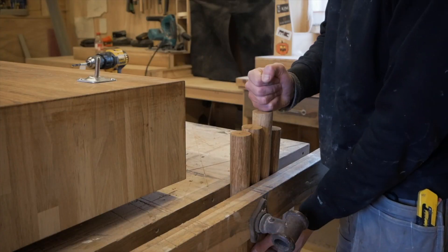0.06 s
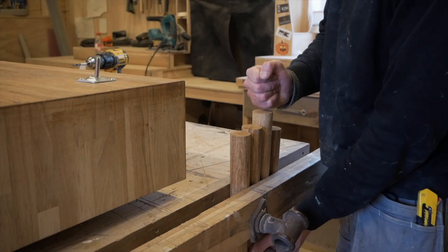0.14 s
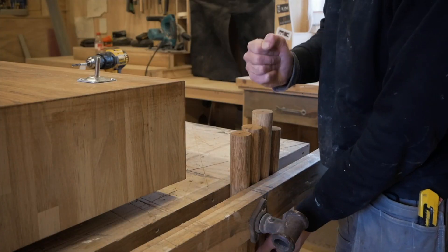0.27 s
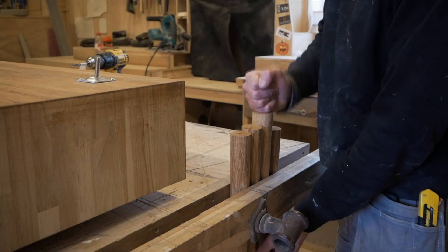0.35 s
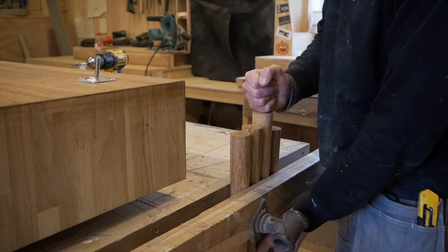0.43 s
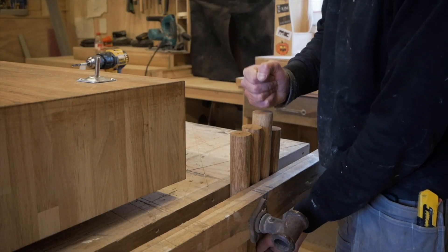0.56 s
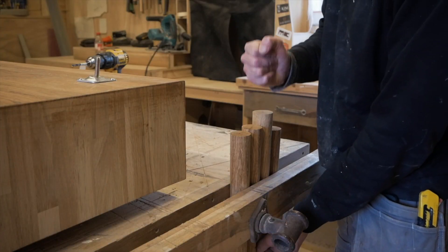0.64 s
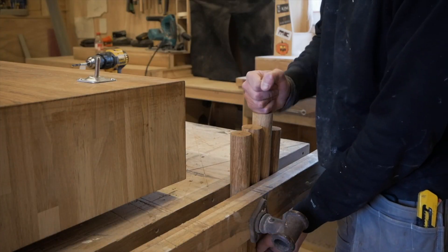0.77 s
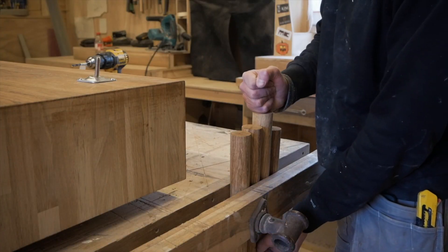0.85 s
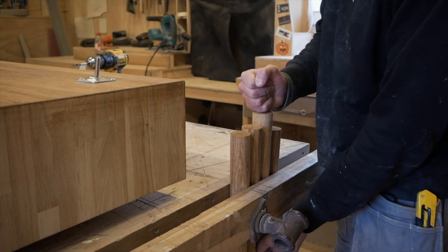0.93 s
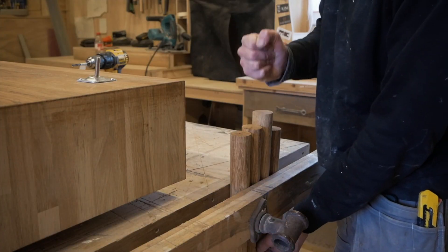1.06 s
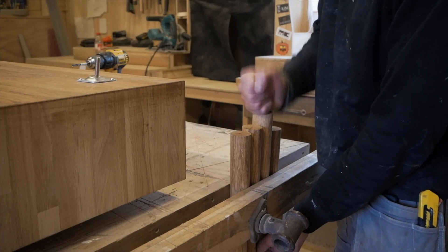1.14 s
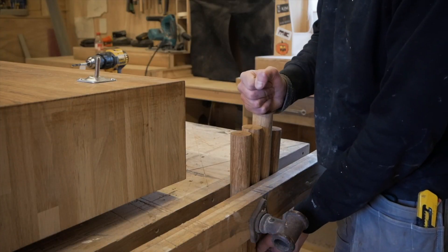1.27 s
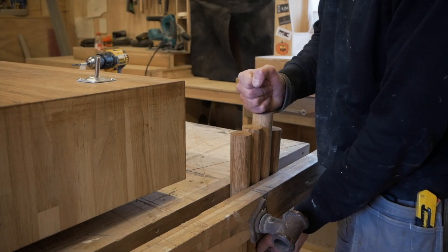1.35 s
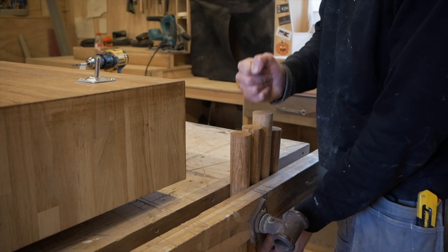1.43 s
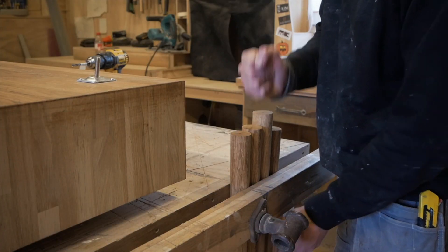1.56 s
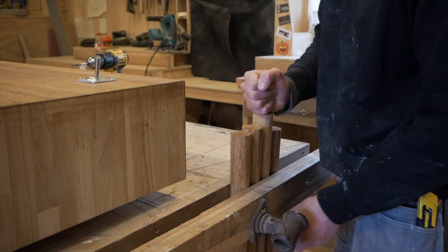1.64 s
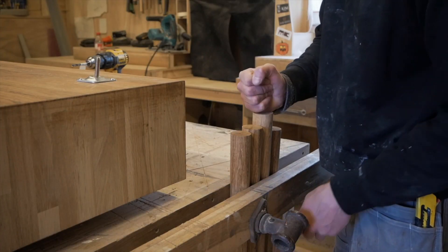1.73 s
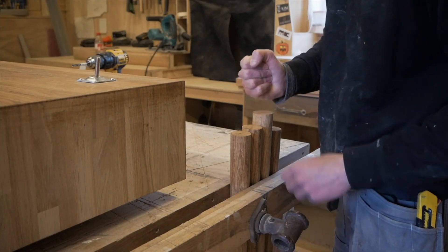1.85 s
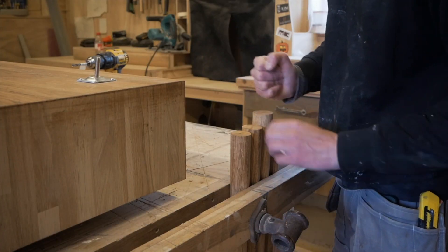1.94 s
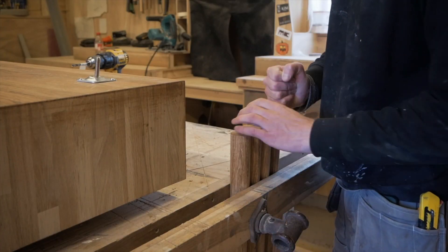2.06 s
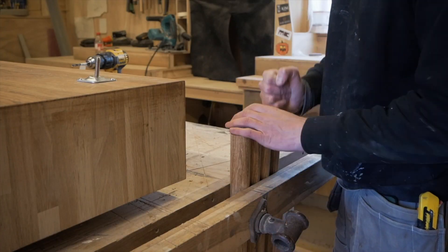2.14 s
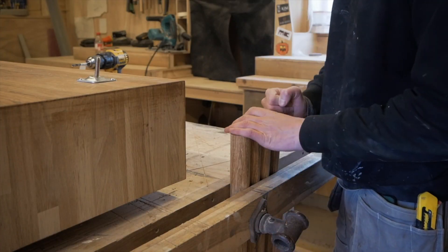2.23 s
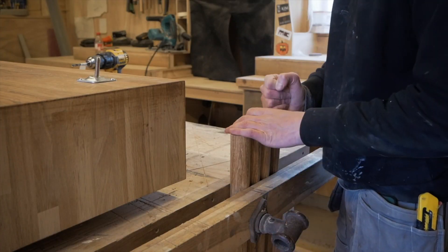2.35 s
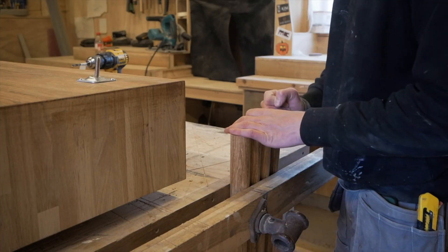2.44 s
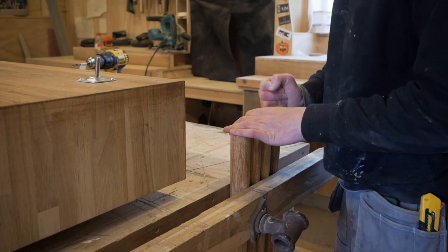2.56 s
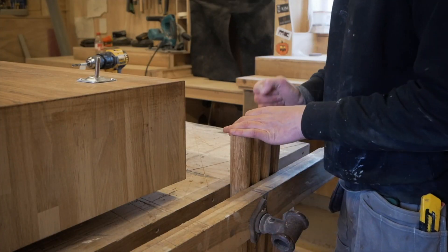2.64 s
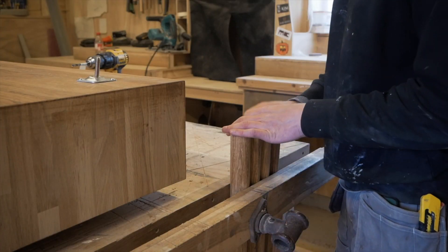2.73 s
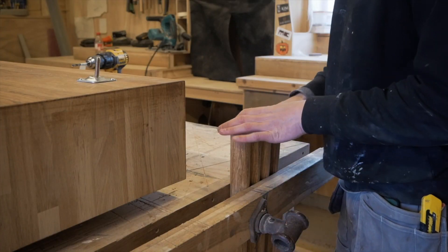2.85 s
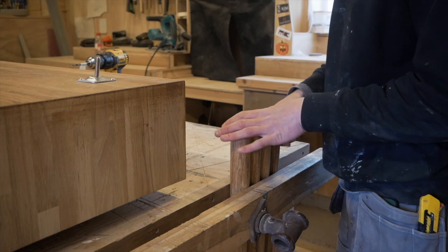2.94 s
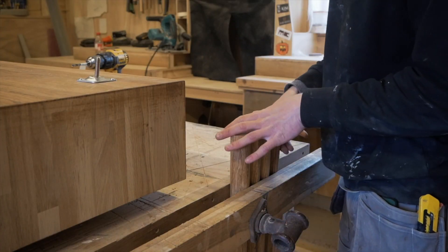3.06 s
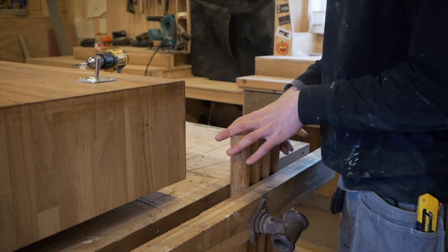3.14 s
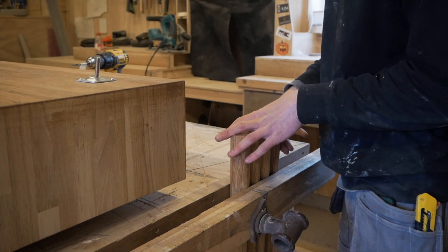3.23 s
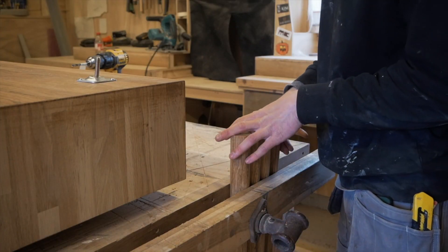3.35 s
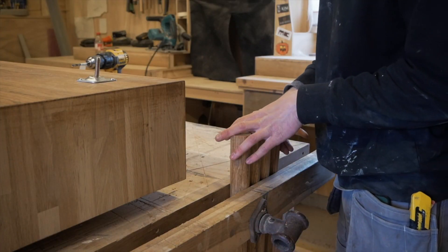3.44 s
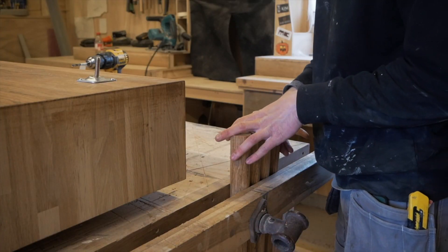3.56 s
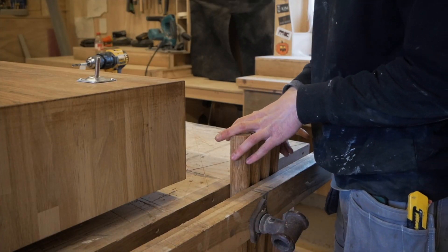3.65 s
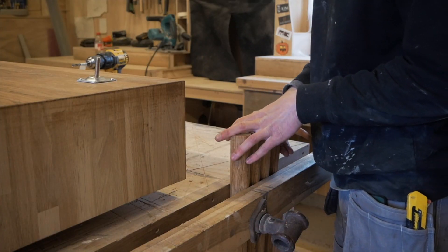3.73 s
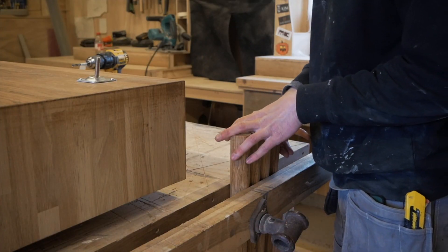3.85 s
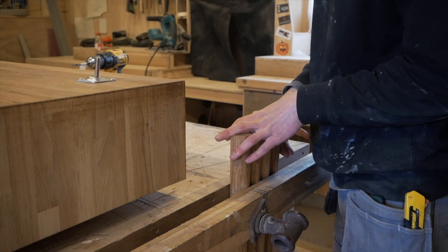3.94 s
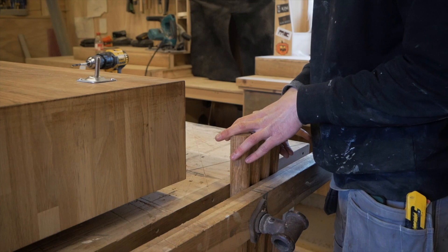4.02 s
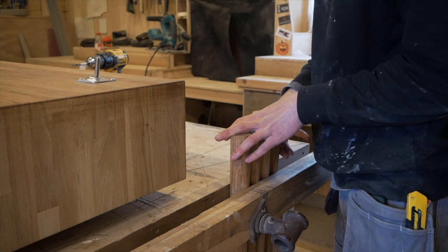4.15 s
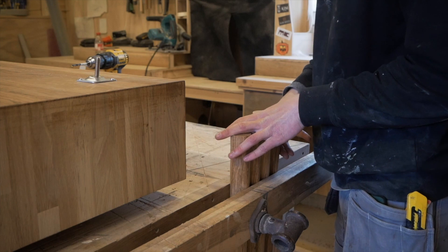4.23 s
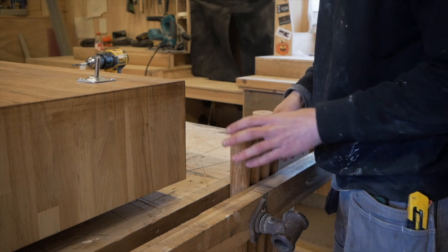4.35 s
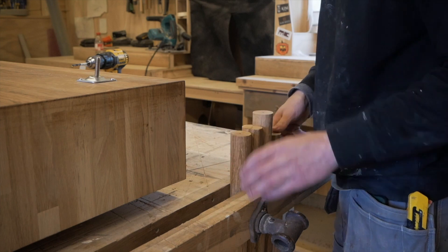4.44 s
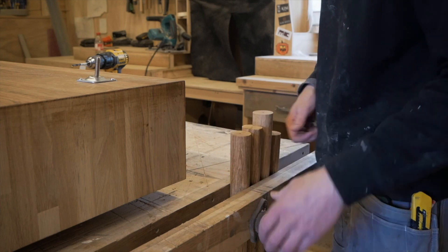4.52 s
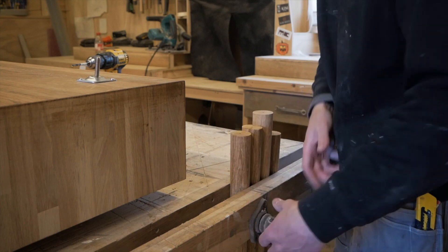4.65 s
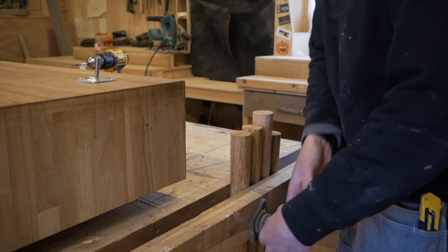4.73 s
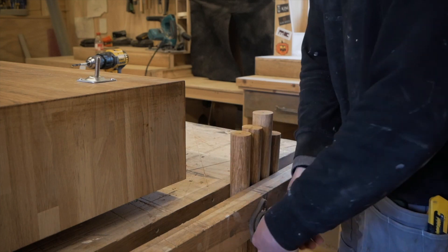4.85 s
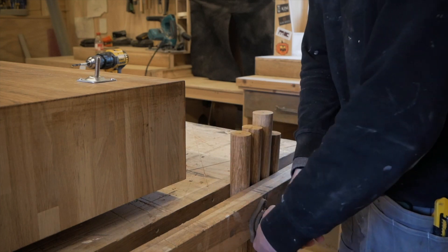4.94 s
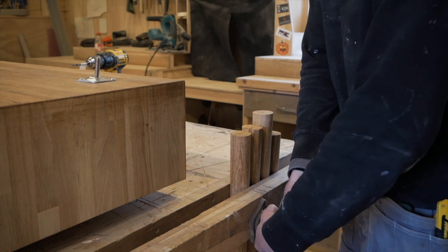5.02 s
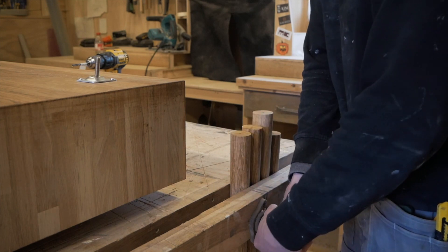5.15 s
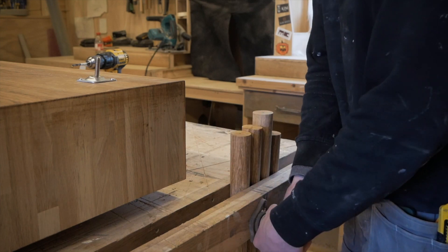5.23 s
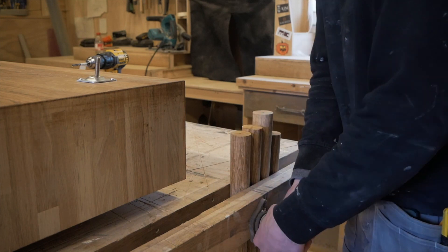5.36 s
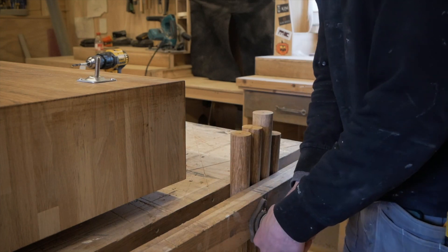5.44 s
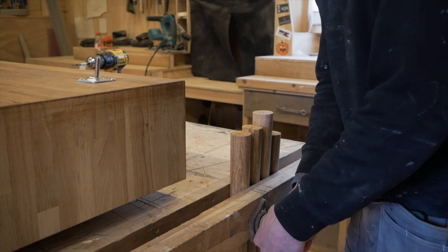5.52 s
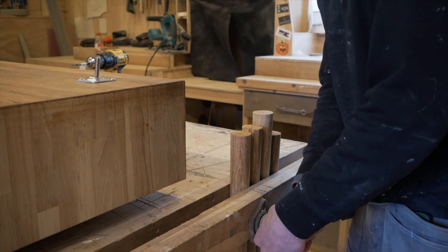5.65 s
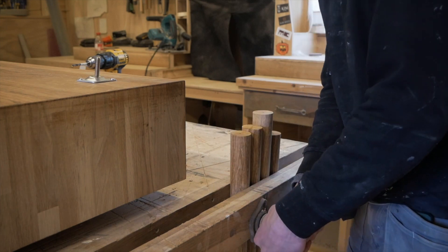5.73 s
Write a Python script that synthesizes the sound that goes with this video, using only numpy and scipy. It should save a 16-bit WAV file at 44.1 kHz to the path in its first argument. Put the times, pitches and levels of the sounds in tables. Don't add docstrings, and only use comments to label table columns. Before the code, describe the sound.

Five heavy hand blows on clamped wood thud through a workshop, then two hollow knocks, gentle growing taps and quiet cloth rubbing.

```python
import sys
import numpy as np
from scipy import signal
from scipy.fft import rfft, irfft
from scipy.io import wavfile

SR = 44100
rng = np.random.default_rng(int(sys.argv[2]) if len(sys.argv) > 2 else 0)


def digitize_waveform(pressure):
    field = np.atleast_2d(pressure).T
    bounded = np.clip(field, -1, 1)
    quanta = np.round(bounded * 32767).astype(np.int16)
    wavfile.write(sys.argv[1], SR, quanta)


def volts_from_db(level):
    exponent = np.asarray(level, float) / 20
    return 10 ** exponent


N = 255206
RUN_IN = SR // 2


def rms_one(x):
    return x / np.sqrt(np.mean(x ** 2) + 1e-20)


def at_hz(points, hz):
    table = np.array(points)
    return np.interp(np.log(hz), np.log(table[:, 0]), table[:, 1])


def coloured(spectrum):
    hz = np.maximum(np.fft.rfftfreq(N, 1 / SR), 5)
    return rms_one(irfft(rfft(rng.standard_normal(N)) * volts_from_db(at_hz(spectrum, hz)), N))


def drift(rate_hz):
    r = np.exp(-2 * np.pi * rate_hz / SR)
    wander = signal.lfilter([1], [1, -2 * r, r * r], rng.standard_normal(N + SR))
    return rms_one(wander[SR:])


def swells(rows, rise_db_s, fall_db_s):
    t = np.arange(N) / SR
    gain = 0
    for s, hold_s, db in rows:
        rise_db = rise_db_s * np.maximum(s - t, 0)
        fall_db = fall_db_s * np.maximum(t - s - hold_s, 0)
        gain = gain + volts_from_db(db - rise_db - fall_db)
    return gain


def ring(force, modes, spread_db):
    out = 0
    for k, ((hz, level_db, t60), chance) in enumerate(zip(modes, rng.standard_normal(8))):
        r = volts_from_db(-60 / (t60 * SR))
        w = 2 * np.pi * hz / SR
        gain = (-1) ** k * volts_from_db(level_db + spread_db * chance)
        out = out + gain * signal.lfilter([0, np.sin(w)], [1, -2 * r * np.cos(w), r * r], force)
    return out / np.abs(out).max()


def push(length_s, size):
    pulse = np.hanning(max(int(length_s * SR), 3))
    return np.pad(pulse, (0, size - len(pulse))) + 1e-18


# frequency in Hz, level in dB per Hz.
AIR_SPECTRUM = [(15, -44), (25, 4.5), (59, -2.5), (93, -12), (193, -10), (267, -1.5), (469, -12.5),
                (945, -7), (1530, -18), (2770, -21), (6920, -34.5), (13200, -34.5), (15500, -43)]
# frequency in Hz, level in dB rms.
MOTOR_LINES = [(48.4, -73), (145.3, -83.5), (290.7, -82.5)]


def room_air():
    t = np.arange(N) / SR
    out = volts_from_db(-64) * coloured(AIR_SPECTRUM)
    for hz, level_db in MOTOR_LINES:
        waver_db = 4.0 + 2.7 * drift(3)
        out += volts_from_db(level_db + waver_db) * np.sin(2 * np.pi * hz * t)
    return out


# start in seconds, hold in seconds, level in dB.
PALM_SLIDES = [(2.79, 0.09, -66), (2.97, 0.078, -70)]
# start in seconds, hold in seconds, level in dB.
SLEEVE_RUBS = [(2.737, 0.025, -83), (4.394, .08, -67.5), (4.555, .04, -67.5), (4.68, 0.11, -66.5),
               (4.883, 0.027, -67.5), (4.988, 0.021, -78.5), (5.196, 0.065, -70), (5.34, 0.36, -71.5)]
# frequency in Hz, level in dB per Hz.
CLOTH_SPECTRUM = [(760, -6.5), (1300, -6.5), (1680, -5), (2830, -6.5), (6980, -23), (13100, -23.5),
                  (14900, -30), (15500, -24)]


def sleeves():
    rise_db_s, fall_db_s, dull_fall_db_s = 285, 125.5, 83.5
    grain = ring(rng.standard_normal(N), [(3700, 0, .012), (2800, -6, .008)], spread_db=0)
    slide = volts_from_db(-14.0 + 2.8 * drift(12)) * rms_one(grain)
    cloth = coloured(CLOTH_SPECTRUM) * volts_from_db(2.2 * drift(17))
    dull_spectrum = [(120, -14), (300, 3.0), (900, 1), (1500, -11), (3000, -51)]
    dull = volts_from_db(2) * coloured(dull_spectrum) * volts_from_db(2.5 * drift(22.0))

    rubs = PALM_SLIDES + SLEEVE_RUBS
    out = swells(PALM_SLIDES, rise_db_s, fall_db_s) * slide
    out += swells(rubs, rise_db_s, fall_db_s) * cloth
    out += swells(rubs, rise_db_s, dull_fall_db_s) * dull
    return out


# start in seconds, hold in seconds, level in dB.
PALM_LEANS = [(3.125, 0.038, -46)]
# start in seconds, hold in seconds, level in dB.
HANDLE_CRANKS = [(4.907, 0.15, -66), (5.198, .15, -70), (5.45, 0.12, -70.5)]


def bench_groan():
    groan = ring(rng.standard_normal(N), [(140, 0, .2), (330, -6, .08), (165, -3, .1)], spread_db=0)
    return swells(PALM_LEANS + HANDLE_CRANKS, rise_db_s=550, fall_db_s=221) * rms_one(groan)


# frequency in Hz, time to fall 60 dB in seconds.
ROOM_T60 = [(60, 0.91), (160, 0.43), (420, 0.72), (1100, 0.65), (2900, 0.56), (5000, 0.5), (7700, 0.42),
            (14000, .2)]
# frequency in Hz, level in dB.
ROOM_DB = [(60, -18.5), (160, -0.5), (420, -6.5), (1100, -9), (2900, -5), (5000, -6), (7700, -16.5),
           (14000, -9)]
# delay in seconds, level in dB.
ECHOES = [(0.011, -17.5), (0.019, -34), (0.033, -22), (.063, -17.5)]


def workshop(wet_db, build_s, wall_hz):
    t = np.arange(SR) / SR
    white = rng.standard_normal((2, SR))
    edges = 40 * 2 ** np.arange(0, 9, .5)
    centres = np.sqrt(edges[1:] * edges[:-1])
    bands = []
    for k, pair in enumerate(zip(edges, edges[1:])):
        band_filter = signal.butter(2, pair, "band", fs=SR, output="sos")
        bands.append(signal.sosfilt(band_filter, white[k % 2]))
    bands = np.array(bands)

    decay_db = wet_db + at_hz(ROOM_DB, centres)[:, None] - 60 * t / at_hz(ROOM_T60, centres)[:, None]
    build = 1 - np.exp(-t / (build_s + 1.1 / centres[:, None]))
    fades = volts_from_db(decay_db) * build

    echoes = np.zeros(SR)
    for delay_s, level_db in ECHOES:
        echoes[round(delay_s * SR)] = volts_from_db(level_db)
    echoes = signal.lfilter(*signal.butter(1, wall_hz, fs=SR), echoes)

    def response():
        return echoes + np.sum(np.roll(bands, rng.integers(SR), axis=1) * fades, axis=0)

    return response


# frequency in Hz, level in dB, time to fall 60 dB in seconds.
SKIN_MODES = [(1700, -5.5, 0.0032), (1928, -6.5, 0.0039), (2603, 13.5, 0.0024), (3690, 1.5, 0.0034),
              (3427, -2.5, 0.006), (4805, 6, 0.00062), (5260, -38, 0.0013)]


def contacts(rows, room, bench, jaws, dowel, slap_s, lead_s):
    out = np.zeros(N + 3 * SR)
    size = SR // 2
    rise = round(.008 * SR)
    t = (np.arange(size) - rise) / SR
    crack_filter = signal.butter(1, [4800, 13500], "band", fs=SR, output="sos")
    for s, knock_db, shove_db, jaw_db, slap_db, crack_db in rows:
        before = 0.91 * np.exp(np.minimum(t, 0) / 0.001)
        after = np.exp(-np.maximum(t, 0) / slap_s)
        shape = np.where(t < 0, before, after)
        burst = rng.standard_normal(size) * shape
        click = np.roll(push(0, size), rise) * np.sqrt(np.sum(burst ** 2))
        skin = ring(np.array([burst, click / 2]), SKIN_MODES, spread_db=1.2)
        crack = signal.sosfilt(crack_filter, [burst * shape ** 2, click / 2])
        crack = crack / np.abs(crack[0]).max()

        wood = volts_from_db(knock_db + 1.5) * ring(push(0.0004, size), dowel, spread_db=2.5)
        wood += volts_from_db(jaw_db - 0.5) * ring(push(0.0014, size), jaws, spread_db=1.2)
        shove = volts_from_db(shove_db - 1.5) * ring(push(0.0071, size), bench, spread_db=3.0)
        body = np.roll(wood, rise) + np.roll(shove, rise - round(lead_s * SR))

        near, sent = body + volts_from_db(slap_db + 2.0) * skin + volts_from_db(crack_db + 8.5) * crack
        heard = signal.fftconvolve(sent, room())
        heard[:size] += near
        at = RUN_IN + round(s * SR) - rise
        out[at:at + len(heard)] += heard
    return out[:RUN_IN + N]


def taps(rows):
    out = []
    for s, knock, shove, slap in rows:
        crack = slap - 11 - 1.26 * (knock - slap)
        out.append((s, knock, shove, knock - 10, slap, crack))
    return out


def rebounds(rows):
    return [(s, knock, jaw - 15.5, jaw, jaw - 24.5, -np.inf) for s, knock, jaw in rows]


# start in seconds, knock in dB, bench shove in dB, skin slap in dB.
FINGER_TAPS = [
    (3.166, -48, -53.5, -56),
    (3.305, -33, -44, -46),
    (3.517, -26.5, -41, -32),
    (3.834, -24.5, -37, -29.5),
    (4.126, -19.5, -32.5, -26),
]
# frequency in Hz, level in dB, time to fall 60 dB in seconds.
BENCH_FRONT = [(75.8, -15.5, 0.49), (139, -3, 0.091), (190.2, 4.5, 0.226)]
JAWS_HELD = [(260, 0, 0.051), (326, -3.5, 0.06), (395, 0.5, 0.14), (434, 3, 0.027), (532, 0, 0.038)]
DOWEL_FINGER = [(715, -8, 0.058), (630, -1.5, 0.012), (1000, 13.5, 0.014), (1301, 4, 0.074),
                (1556, 7, 0.017), (2037, -8.5, 0.049), (2765, -3, 0.033), (3775, -4, .025)]


def finger_taps(room):
    return contacts(taps(FINGER_TAPS), room, BENCH_FRONT, JAWS_HELD, DOWEL_FINGER,
                    slap_s=0.011, lead_s=0.00049)


# start in seconds, knock in dB, bench shove in dB, skin slap in dB.
SEATINGS = [
    (2.257, -33.5, -47, -38),
    (2.273, -13.5, -37.5, -32.5),
    (2.487, -16, -33.5, -36.5),
]
# start in seconds, knock in dB, jaw in dB.
SEAT_REBOUNDS = [(2.511, -25.5, -26.5)]
# frequency in Hz, level in dB, time to fall 60 dB in seconds.
DOWEL_SEAT = [(706, 2.5, 0.035), (790, 0, 0.042), (908, 6.5, 0.028), (1034, 1, 0.03), (1245, -1, 0.055),
              (1820, -6, 0.018), (2550, -10, 0.011), (3610, -16.5, .01)]
JAWS_LOOSE = [(382, 4, 0.16), (426.5, 4.9, 0.35), (491, 7.3, 0.15), (553, 5, 0.034)]
BENCH_BACK = [(64.3, -10.5, 0.12), (136.1, -0.5, 0.27), (180.2, 1, 0.097), (224.3, 3.5, 0.072)]


def seating_knocks(room):
    rows = taps(SEATINGS) + rebounds(SEAT_REBOUNDS)
    return contacts(rows, room, BENCH_BACK, JAWS_LOOSE, DOWEL_SEAT, slap_s=0.0056, lead_s=0.0012)


def punches(rows):
    flesh, bone = [], []
    bone_lag_s = .0046
    for s, knock, shove, jaw, slap in rows:
        flesh.append((s, slap, shove, slap - 4.5, slap, slap - 15))
        bone.append((s + bone_lag_s, knock, -np.inf, jaw, knock - 11, knock - 28))
    return flesh + bone


# start in seconds, dowel knock in dB, bench shove in dB, vise jaw in dB, skin slap in dB.
FIST_BLOWS = [
    (-.335, -12.5, -22, -13, -8.5),
    (.0435, -23.5, -31.5, -36, -26.5),
    (.4035, -4, -55, -16.5, -23),
    (.7945, -15, -19, -18.5, -14),
    (1.1993, -12, -13.5, -13, -15),
    (1.639, -16, -17, -15, -20.5),
]
# start in seconds, knock in dB, jaw in dB.
FIST_REBOUNDS = [(.0575, -17, -22.5), (.427, -34, -14)]
# frequency in Hz, level in dB, time to fall 60 dB in seconds.
JAWS_SHUT = [(270.4, -5.5, 0.037), (337.6, -3, 0.047), (395.5, 0, 0.04), (441, -2.5, 0.034),
             (569.6, -5.5, 0.038)]
DOWEL_PROUD = [(623, 6, 0.015), (690, 2, 0.04), (797, 8.8, .02), (915, 7.4, .02), (1071, 11.76, .01),
               (1325, 7.7, 0.011), (1437, 7.9, 0.011), (1649, 2.5, 0.012)]
DOWEL_DRIVEN = [(644, 6, 0.011), (722, 5, 0.035), (740, 6.5, 0.028), (960, 10, 0.015), (1087, 12, 0.0078),
                (1330, 7, 0.0071), (1644, 2, 0.0087), (1766, 1, 0.0086)]


def fist_blows(room):
    proud = punches(FIST_BLOWS[:3]) + rebounds(FIST_REBOUNDS)
    driven = punches(FIST_BLOWS[3:])
    out = contacts(proud, room, BENCH_BACK, JAWS_SHUT, DOWEL_PROUD, slap_s=0.0071, lead_s=.004)
    out += contacts(driven, room, BENCH_BACK, JAWS_SHUT, DOWEL_DRIVEN, slap_s=0.0057, lead_s=0.0041)
    return out


def scene():
    room = workshop(wet_db=-24, build_s=0.00057, wall_hz=4000)
    blows = finger_taps(room) + seating_knocks(room) + fist_blows(room)
    blows = signal.sosfilt(signal.butter(2, 45, "high", fs=SR, output="sos"), blows)[RUN_IN:]
    mid = room_air() + sleeves() + bench_groan() + blows

    treble = signal.sosfilt(signal.butter(2, 7000, "high", fs=SR, output="sos"), mid)
    side = volts_from_db(-17) * treble * drift(2000)
    side += volts_from_db(-36) * np.roll(mid, 40)
    hiss_filter = signal.butter(1, 4000, "high", fs=SR, output="sos")
    hiss = signal.sosfilt(hiss_filter, rng.standard_normal((2, N)))
    return mid + side * [[1], [-1]] + volts_from_db(-78) * hiss


def band_limit(x):
    return signal.sosfilt(signal.butter(12, 16180, fs=SR, output="sos"), x)


def record(dry):
    mix = signal.sosfilt(signal.butter(12, 14700, fs=SR, output="sos"), dry)
    return band_limit(mix)


dry = scene()
out = record(dry)
digitize_waveform(out)
```